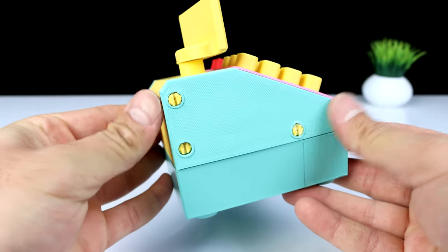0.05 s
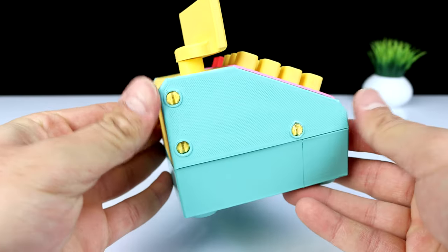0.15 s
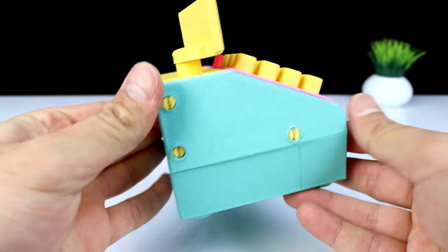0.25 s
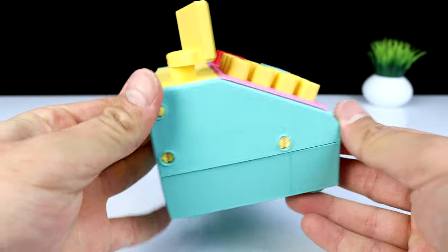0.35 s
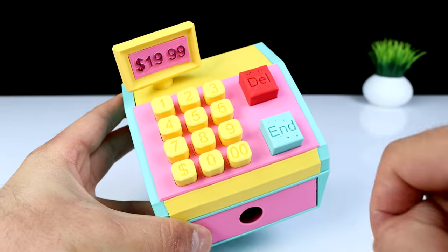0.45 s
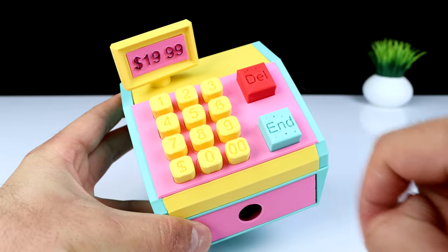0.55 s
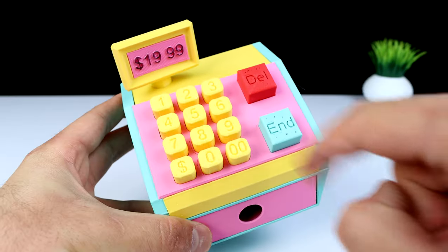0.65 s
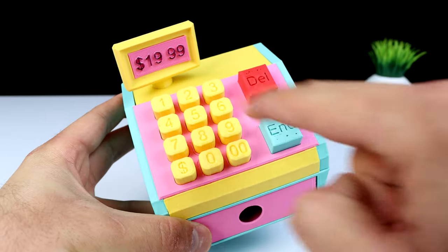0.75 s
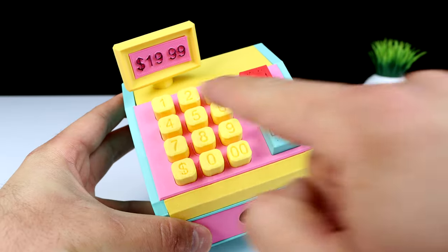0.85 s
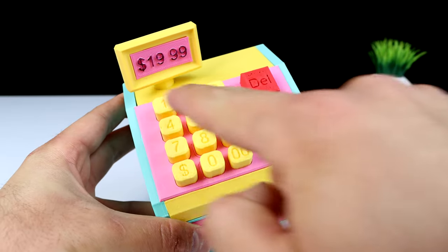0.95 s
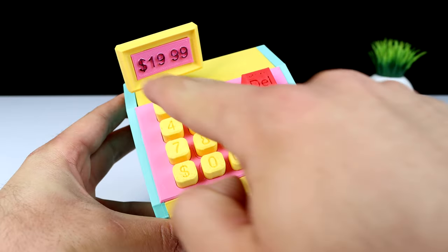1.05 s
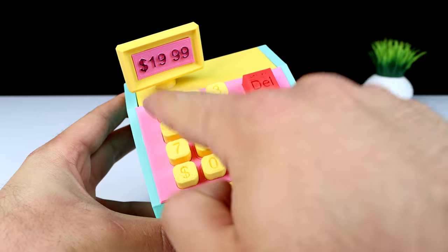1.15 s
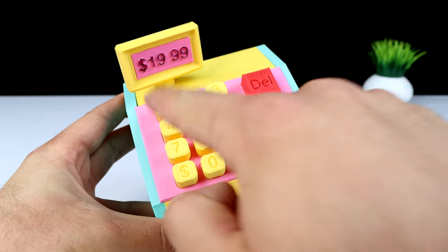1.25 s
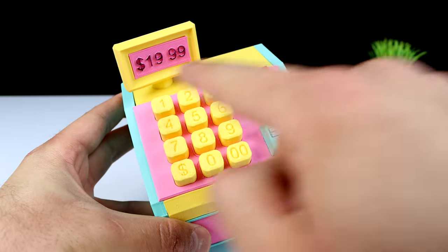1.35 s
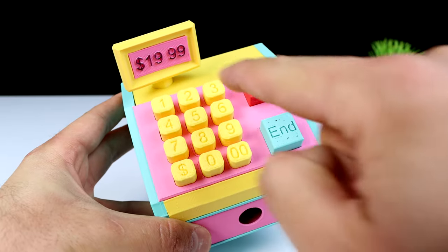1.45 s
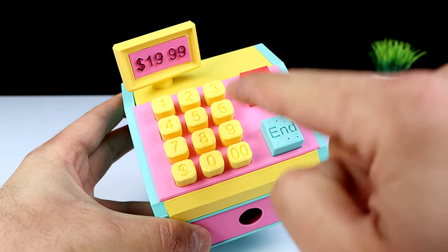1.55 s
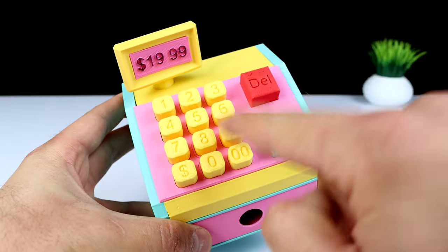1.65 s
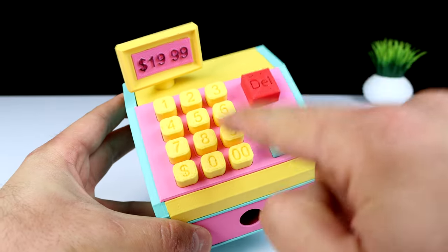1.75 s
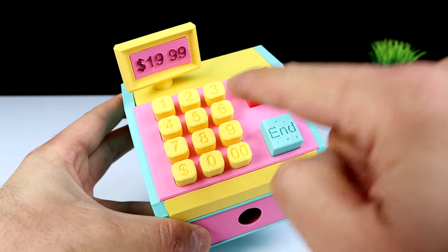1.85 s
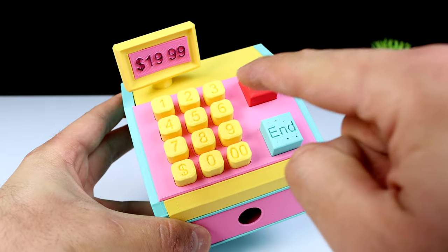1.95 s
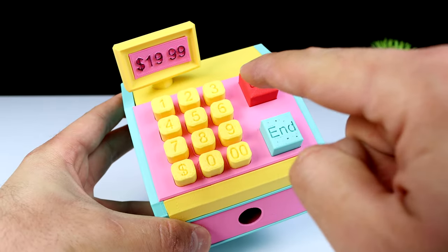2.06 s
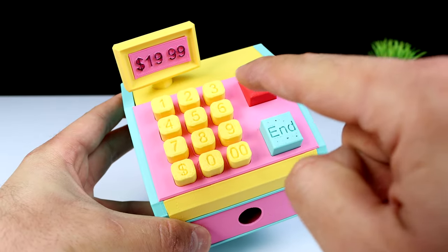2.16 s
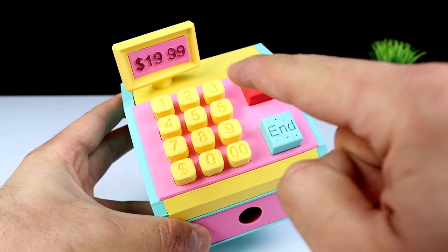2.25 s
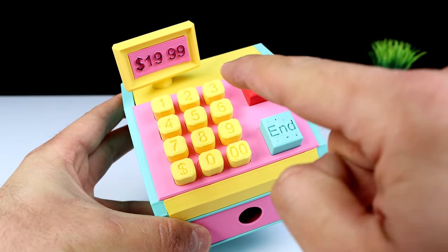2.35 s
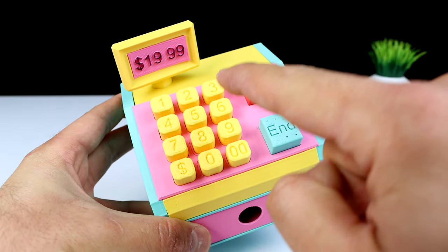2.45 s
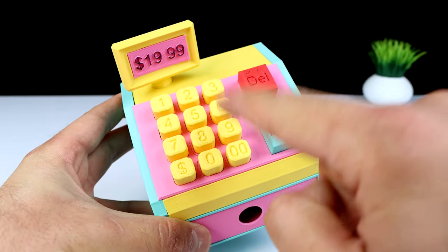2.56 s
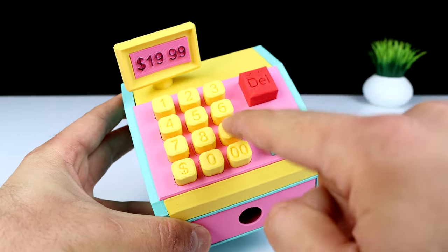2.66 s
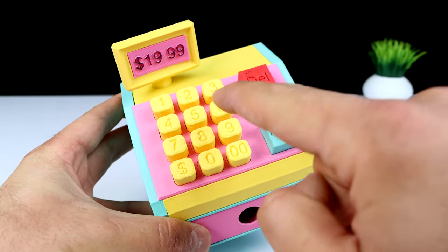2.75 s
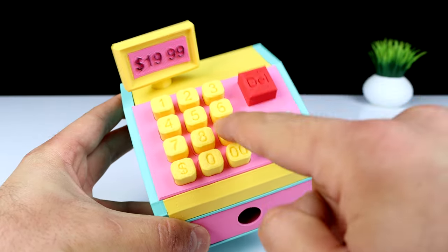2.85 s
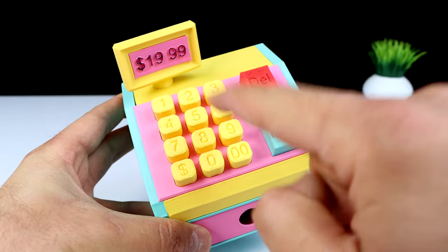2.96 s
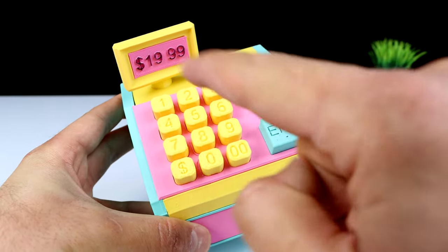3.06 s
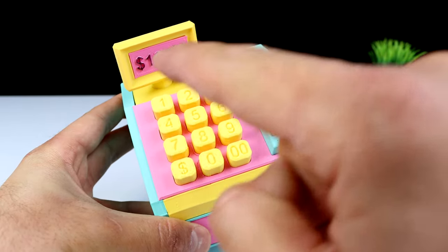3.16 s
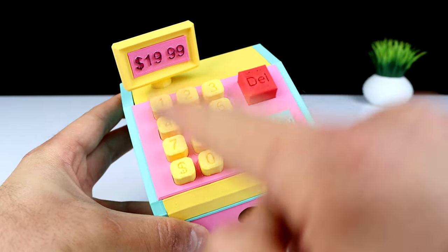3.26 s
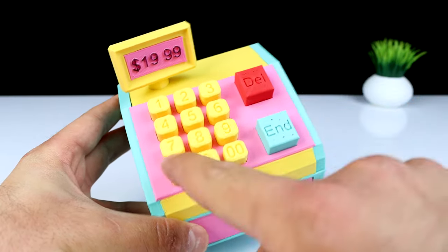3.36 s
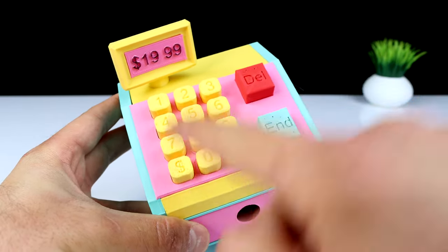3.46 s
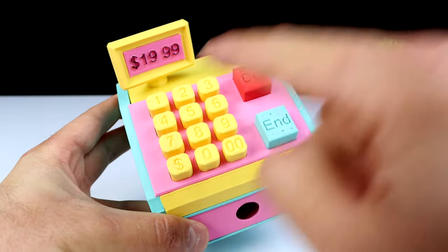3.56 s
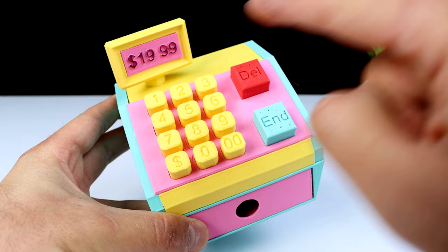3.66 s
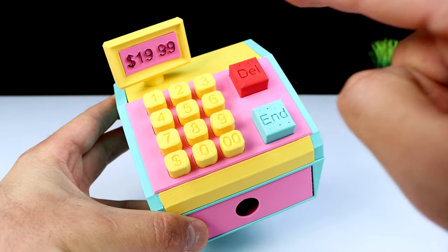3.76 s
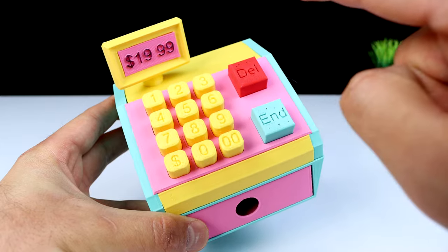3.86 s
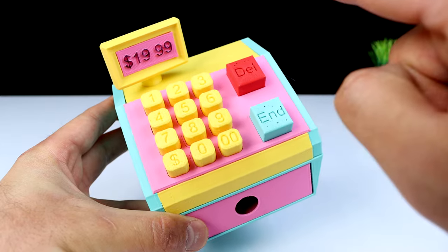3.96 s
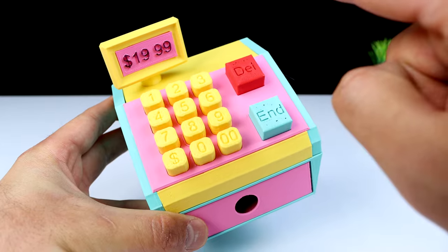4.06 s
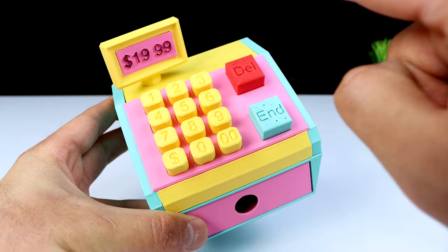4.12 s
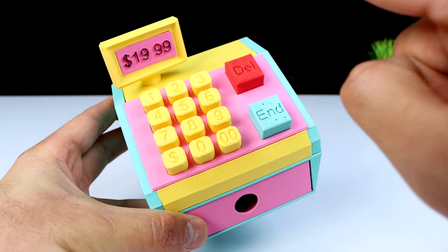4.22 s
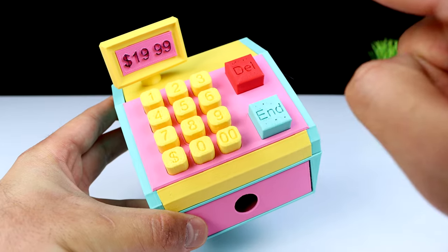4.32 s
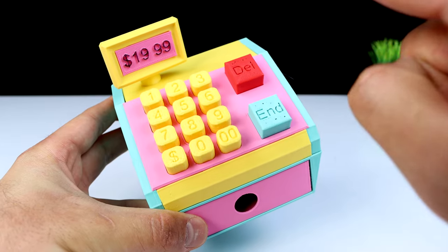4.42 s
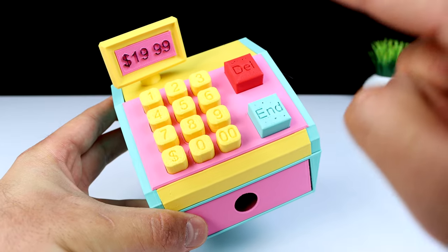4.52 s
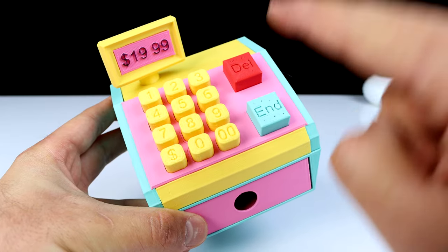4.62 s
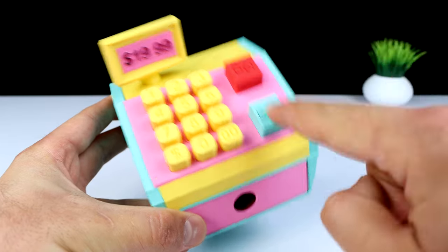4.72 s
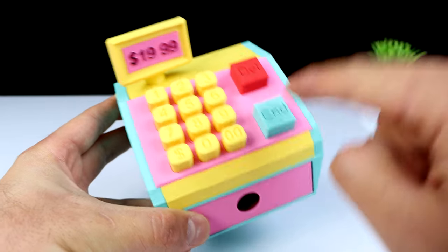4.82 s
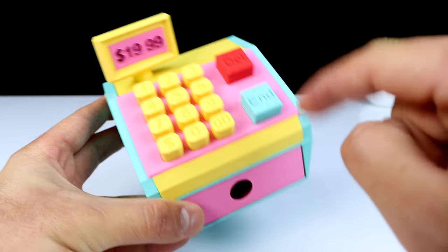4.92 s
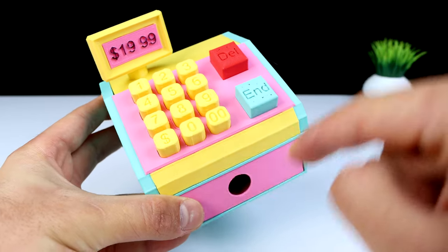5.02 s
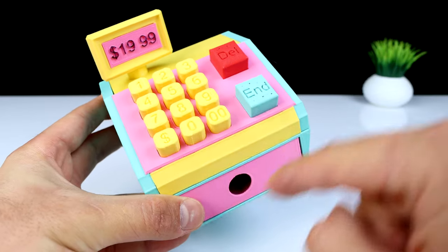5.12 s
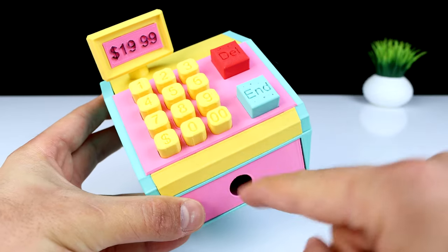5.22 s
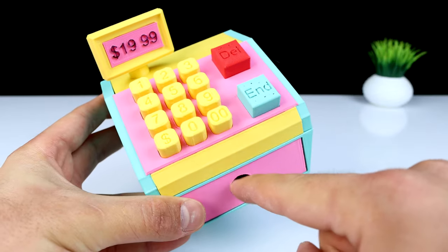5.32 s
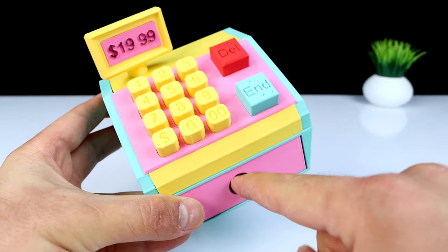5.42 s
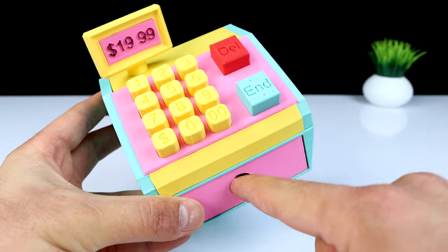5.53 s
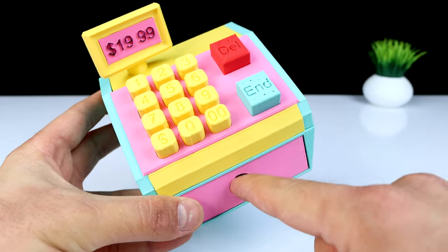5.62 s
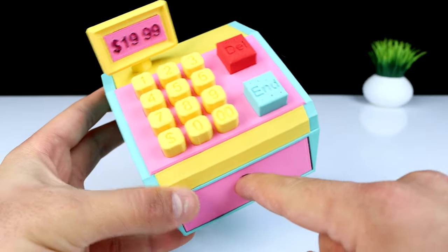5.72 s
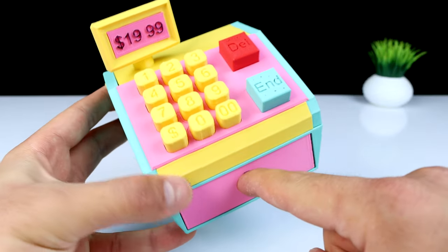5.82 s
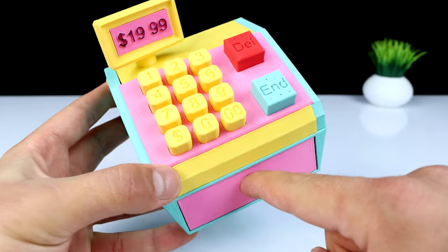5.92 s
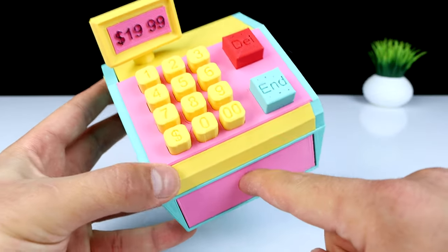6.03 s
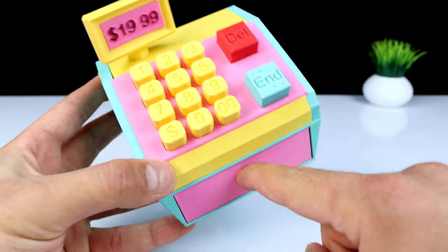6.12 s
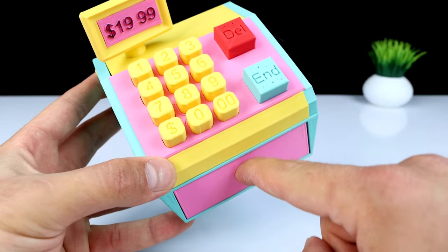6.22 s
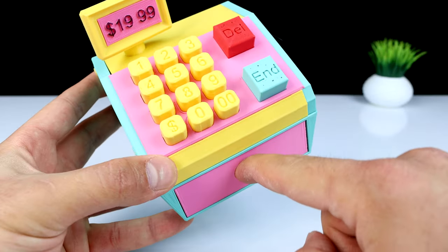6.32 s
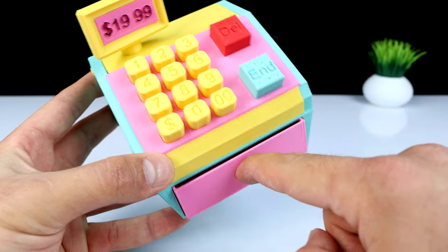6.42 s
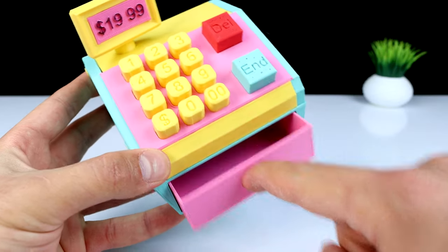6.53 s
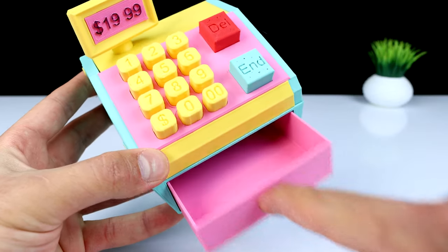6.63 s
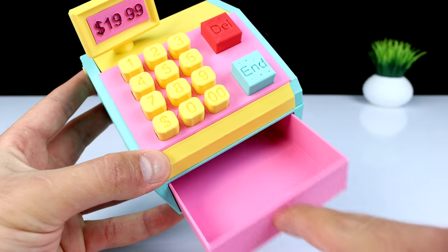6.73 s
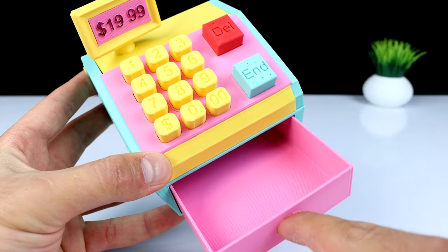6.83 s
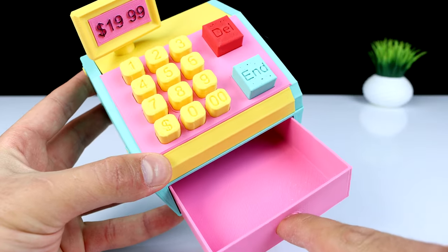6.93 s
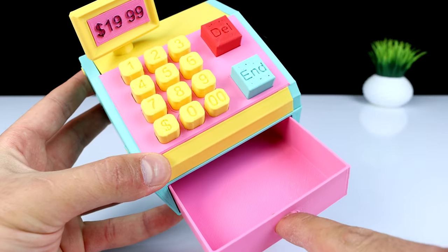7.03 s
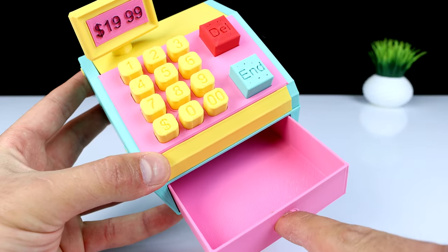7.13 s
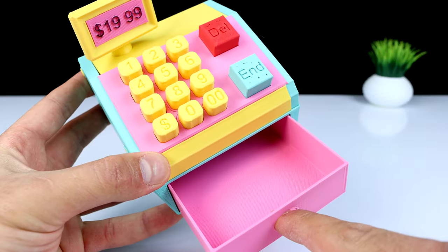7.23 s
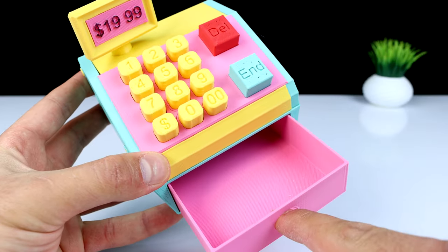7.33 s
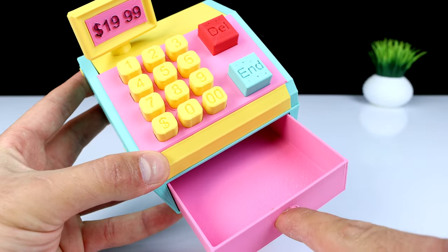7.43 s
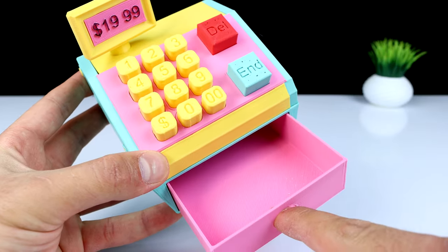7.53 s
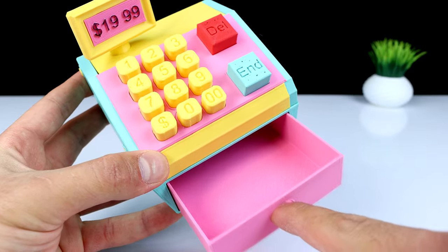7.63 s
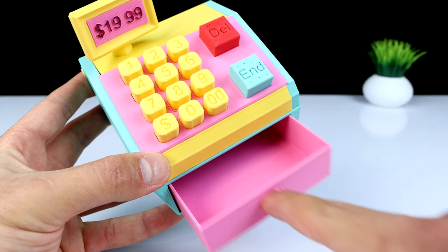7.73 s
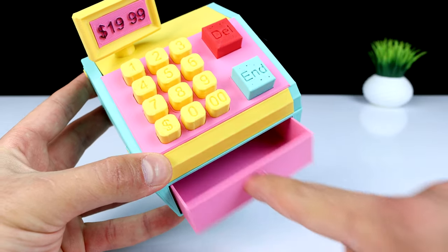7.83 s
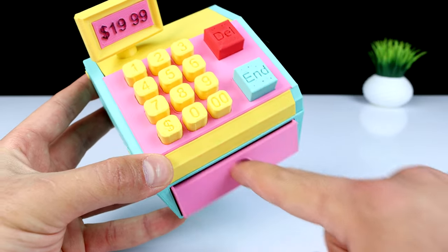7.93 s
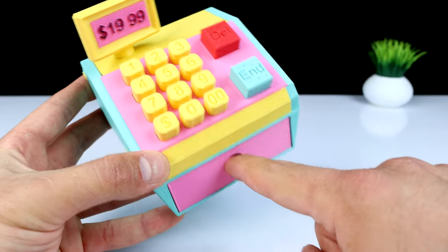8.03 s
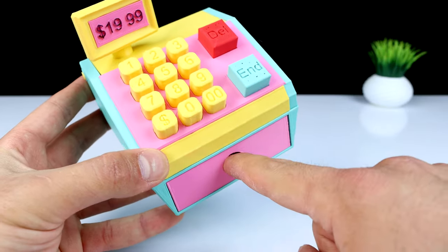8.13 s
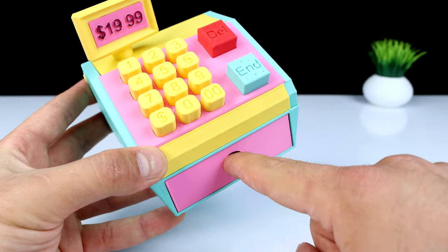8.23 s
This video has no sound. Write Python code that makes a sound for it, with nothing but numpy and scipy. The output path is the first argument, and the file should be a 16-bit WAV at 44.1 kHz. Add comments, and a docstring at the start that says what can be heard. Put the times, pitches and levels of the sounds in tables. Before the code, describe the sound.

In a small quiet room with a soft low hum, a hollow plastic toy is handled close to a stereo microphone. From 0 to 1 second there are only faint skin brushes and a tiny tick. Sparse, very soft key clicks and short scuffs follow at about 1.3, 1.8, 2.7, 2.9 and 3.4 seconds, then near stillness. At 4.8 a key bottoms out with a loud, boxy thud and crisp rebound click. Around 5.2 to 6 a fingertip rubs and picks at the drawer, giving small knocks, hiss and brief hums; light clicks follow at 6.1 and 6.4. From 6.5 to 6.9 the drawer rasps and groans outward, clacking and juddering quickly against its stop. A quiet pause follows. At 7.7 it slides back with a gentler scrape, knocking sharply shut at 8.06, with a short room tail.

```python
"""A fingertip brushes the side of a hollow plastic toy cash register, close by in a small, softly humming room.
Keys click and one bottoms out with a thud: impacts excite the decaying modes of case, walls and edges.
A fingertip rubs and picks at the drawer: irregular slips of the skin make hiss and set the part humming.
The drawer rasps out, judders against its stop, and is pushed back until it knocks shut:
stick-slip friction drives the resonances of cavity, tray and walls. Diffuse reflections follow every sound."""
import sys
import numpy as np
from scipy import signal
from scipy.fft import rfft, irfft, next_fast_len
from scipy.io import wavfile
from scipy.ndimage import uniform_filter1d

SR = 44100
rng = np.random.default_rng(int(sys.argv[2]) if len(sys.argv) > 2 else 0)


def dump_mix(stems):
    """Bounce the given channels to the path in sys.argv[1] as a 16-bit WAV at rate SR."""
    frames = np.atleast_2d(stems).T  # one column per channel
    limited = np.clip(frames, -1, 1)  # hard clip at full scale
    pcm = np.round(limited * 32767).astype(np.int16)
    wavfile.write(sys.argv[1], SR, pcm)


N = 365147
TIME = np.arange(N) / SR
# Stereo width of the toy. Each row: frequency in Hz, side relative to mid in dB.
TOY_WIDTH = [(100, -17), (500, -16), (1000, -13), (2000, -11), (4000, -6), (8000, 1.5), (13000, 1)]
# Stereo width of diffuse sound. Each row: frequency in Hz, side relative to mid in dB.
ROOM_WIDTH = [(60, -11.5), (150, -13.5), (370, -8), (930, -2), (2320, 1), (5780, 0), (14400, 0)]


def contacts():
    """Impact excitation: a contact knocks the case, clacks the walls and ticks at the edge; hard ones rebound."""
    # Plastic meets plastic. Each row: start in seconds, relative levels in dB of the knock of the case,
    # the clack of the walls and the tick of the edge, favoured case pitch in Hz, favoured edge pitch in Hz.
    contact_rows = [(0.407, -62, -61, -50.5, 600, 8540), (1.255, -51, -55, -58, 895, 3400),
                    (1.763, -45, -49, -48, 560, 6340), (1.8061, -42.5, -40.5, -35, 600, 5040),
                    (2.690, -46, -53, -47, 507, 5500), (2.923, -36.5, -50, -46, 490, 5150),
                    (2.990, -47, -61, -65, 305, 3060), (3.424, -36.5, -51, -52, 340, 6900),
                    (4.8011, -24.5, -37.5, -38, 516, 8950), (4.810, -15, -27, -43, 590, 1700),
                    (4.831, -29, -30, -28.5, 600, 4150), (5.4568, -27, -39, -45.5, 690, 3900),
                    (5.529, -37, -63, -62, 600, 2500), (5.751, -35, -51, -62, 420, 3200),
                    (6.0751, -39, -33.5, -37.5, 520, 5000), (6.392, -27, -34.5, -41, 430, 3604),
                    (6.562, -47, -36, -40, 600, 2806), (6.723, -22.5, -24, -35, 596, 2670),
                    (6.7754, -24, -24.5, -34.5, 793, 2700), (6.815, -23.5, -42, -35, 620, 6100),
                    (7.770, -26, -33, -43, 553, 2994), (8.0574, -14, -20.5, -31, 483, 3414),
                    (8.0641, -16, -23, -31, 450, 3480)]
    # The hollow case. Each row: frequency in Hz, relative level in dB, 60 dB decay time in seconds.
    case_modes = [(191.5, -26, .15), (289, -9.5, 0.38), (341, -12, 0.22), (414.6, -12, 0.28),
                  (493.7, -2.5, 0.09), (526.7, -2, .07), (550, -4, .08), (646, -16, 0.048),
                  (762, -12, 0.14), (901, -11.5, 0.054)]
    # Crowded upper modes of the thin walls. Each row: frequency in Hz, width in Hz, relative level in dB.
    wall_peaks = [(1007, 166, 7), (1350, 290, -1.5), (1515, 177, 0.5), (1960, 110, 1), (2270, 410, -3.5)]
    # Modes near the touching edges. Each row: frequency in Hz, width in Hz, relative level in dB.
    edge_peaks = [(2770, 350, 8.5), (3570, 240, 11.5), (4350, 600, 4), (5870, 970, 0.5), (8000, 1900, 1.5),
                  (12000, 5400, -1.5)]
    rebound_above_db, rebound_s = -20, .01
    rebound_body_db, rebound_edge_db = -9.5, -6  # weaker, and brighter as the edge loses less than the body
    out = np.zeros((2, N))
    t = np.arange(SR // 2) / SR
    for s, knock_db, clack_db, tick_db, case_hz, edge_hz in contact_rows:
        wall_hz = np.sqrt(case_hz * edge_hz)
        case = [(hz, db + favour(hz, case_hz, slope_db=13.0), t60) for hz, db, t60 in case_modes]
        edges = [(hz, width, db + favour(hz, edge_hz, slope_db=12.0)) for hz, width, db in edge_peaks]
        walls = [(hz, width, db + favour(hz, wall_hz, slope_db=9.5)) for hz, width, db in wall_peaks]
        touches = [(s, 0, 0)]
        if knock_db > rebound_above_db:
            touches.append((s + rebound_s, rebound_body_db, rebound_edge_db))
        for at_s, body_db, edge_db in touches:
            knock = struck(case, t, scatter_db=1.0)
            clack = crack(t, walls, t60=0.017, ring_db=-13, ring_t60=0.14)
            tick = crack(t, edges, t60=0.0093, ring_db=-9.5, ring_t60=0.052)
            sound = from_db(knock_db + body_db) * knock
            sound = sound + from_db(clack_db + body_db) * clack
            sound = sound + from_db(tick_db + edge_db) * tick
            add(out, at_s, sound)
    return out


def drawer_pull():
    """Stick-slip excitation of the tray's resonances as the drawer is pulled out."""
    # Friction on the rails. Each row: time in seconds, friction in dB.
    friction = [(6.485, -59), (6.569, -37), (6.633, -38.5), (6.729, -27.5), (6.769, -33.5), (6.777, -27.5),
                (6.811, -34.5), (6.857, -36), (6.885, -53)]
    # Groan of the cavity before its pitch bend. Each row: frequency in Hz, width in Hz, relative level in dB.
    groan_peaks = [(190.3, 9.6, -16.5), (289.5, 21, -10.5), (403, 56, -15), (533, 32, 1), (574.4, 70, -1),
                   (638.6, 43, 1.5), (829, 37, -3.5)]
    # Ring of the tray. Each row: frequency in Hz, width in Hz, relative level in dB.
    ring_peaks = [(1006, 46, 0), (1112, 40, -2), (1217, 61, -3.5)]
    # Rasp of the rails. Each row: frequency in Hz, relative level in dB per Hz.
    rasp_spectrum = [(900, -21), (1400, 1.5), (2200, -2), (2800, -4.5), (3600, -4), (4600, -12),
                     (6000, -14), (8000, -16), (12500, -20), (14500, -33.5)]
    return stroke(friction, groan_peaks, ring_peaks, rasp_spectrum, groan_db=-26.5, ring_db=-38,
                  rasp_db=-35.5, groan_follows=0.92, ring_follows=1.5)


def drawer_push():
    """Stick-slip excitation of the tray's resonances as the drawer is pushed in."""
    # Friction on the rails. Each row: time in seconds, friction in dB.
    friction = [(7.682, -62), (7.776, -44), (7.806, -43.5), (7.938, -36.5), (8.036, -41), (8.045, -45.5)]
    # Groan of the cavity before its pitch bend. Each row: frequency in Hz, width in Hz, relative level in dB.
    groan_peaks = [(305, 38, -12), (418, 34, -6.5), (520, 61, -1), (598, 28, 1), (656, 18, -1),
                   (793, 30, 1)]
    # Ring of the tray. Each row: frequency in Hz, width in Hz, relative level in dB.
    ring_peaks = [(1030, 290, -8), (1214, 42, 5)]
    # Rasp of the rails. Each row: frequency in Hz, relative level in dB per Hz.
    rasp_spectrum = [(900, -22), (1400, -1), (1700, 1), (2000, 0.5), (2800, -5.5), (3800, -2), (4800, -11),
                     (6000, -14), (8000, -16), (12500, -21.5), (14500, -27)]
    return stroke(friction, groan_peaks, ring_peaks, rasp_spectrum, groan_db=-29, ring_db=-35,
                  rasp_db=-35.5, groan_follows=0.55, ring_follows=0.81)


def stroke(friction, groan_peaks, ring_peaks, rasp_spectrum, groan_db, ring_db, rasp_db,
           groan_follows, ring_follows):
    """Friction-driven resonance: cavity groan, tray ring and rail rasp each grow as a power of the friction."""
    # The sliding drawer shifts the cavity's resonances. Each row: time in seconds, pitch ratio.
    cavity_bend = [(6.5, 0.88), (6.6, .93), (6.69, 1.0), (6.999, 0.96), (7.66, .9), (7.861, 1.0)]
    # The tray chatters on its rails and rings out. Each row: centre in seconds, full width to 1/e in
    # seconds, relative level in dB.
    chatters = [(6.655, .025, -31), (6.703, .016, -28), (6.733, 0.014, -19), (6.836, .016, -24),
                (6.856, 0.019, -22.5), (7.852, 0.051, -29), (7.915, 0.067, -34)]
    usual_friction_db, fade_s = -36, .012  # groan_db, ring_db and rasp_db hold at the usual friction
    s, db = np.transpose(friction)
    moving = np.interp(TIME, [s[0] - fade_s, s[0], s[-1], s[-1] + fade_s], [0, 1, 1, 0])
    drive = from_db(np.interp(TIME, s, db) - usual_friction_db)
    force = spread(slips(per_s=2200, size_db=3.0, smooth=.45)) * catching(per_s=120, depth_db=3.3)

    cavity = band(resonate(force, groan_peaks), 130, 840)
    groan = evened(bent(cavity, cavity_bend), window_s=0.018)
    ring = evened(band(resonate(force, ring_peaks), 750, 1500), window_s=0.034)
    rasp = evened(coloured(ringing_walls(force, direct_db=-8), rasp_spectrum), window_s=0.033)

    groan_level = from_db(groan_db) * drive ** groan_follows
    ring_level = np.hypot(from_db(ring_db) * drive ** ring_follows, swells(chatters))
    rasp_level = from_db(rasp_db) * drive
    return moving * (groan_level * groan + ring_level * ring + rasp_level * rasp)


def judder(start_s=6.7675, per_s=322, peak_s=0.0067, level_db=3.5, count=7):
    """Repeated impact: at the end of its travel the tray bounces on the stop in a quick swell."""
    # Modes of the tray on its stop. Each row: frequency in Hz, relative level in dB, 60 dB decay time in seconds.
    stop_modes = [(524, -37, 0.045), (664, -17, 0.062), (830, -35, .03), (980, -15.5, 0.05),
                  (1210, -38, 0.022), (1585, -34, 0.033), (2740, -30, 0.028), (3530, -37, 0.024)]
    out = np.zeros((2, N))
    t = np.arange(SR // 4) / SR
    bounce = struck(stop_modes, t, scatter_db=.7)
    for delay in np.arange(1, count) / per_s:  # count - 1 bounces
        force = (delay / peak_s * np.exp(1 - delay / peak_s)) ** 4
        add(out, start_s + delay, from_db(level_db) * force * bounce)
    return out


def hands():
    """Coupled friction: skin sets each part of the toy humming at that part's own resonances."""
    # Three parts. Each row of each: frequency in Hz (drawer: before its bend), width in Hz, relative level in dB.
    side_panel = [(542, 75, -8.5), (640, 15, 1.5), (724, 44, -14), (1500, 48, -13.5)]
    underside = [(239, 42, 3), (337, 34, -4), (420, 18, -3), (588, 20, -11.5), (1020, 66, -10),
                 (1400, 120, -12.5)]
    drawer_front = [(434, 98, -5), (557, 68, -1.5), (652, 34, 0.5), (747, 47, -2), (1960, 59, -23),
                    (2163, 65, -12)]
    # The loading finger shifts the drawer's resonances. Each row: time in seconds, pitch ratio.
    finger_bend = [(5.46, 1.025), (5.56, 0.99), (5.65, .85), (5.76, .8), (6.0, 0.87)]
    still_parts = rubbing("side", side_panel) + rubbing("underside", underside)
    return still_parts + rubbing("drawer", drawer_front, bend=finger_bend)


def rubbing(part, peaks, bend=None):
    """Skin friction: light catching makes fine hiss, and the touched part answers with a resonant hum."""
    # Skin drags over a part. Each row: start in seconds, length in seconds, relative levels in dB of the
    # hum of the part and of the hiss, part touched.
    rub_rows = [(0.053, .18, -60, -55.5, "side"), (0.088, 0.097, -63, -51, "side"),
                (0.227, 0.071, -54, -61.5, "side"), (0.317, 0.18, -59, -64.5, "side"),
                (0.522, 0.49, -62.5, -71.5, "underside"), (3.174, 0.19, -64.5, -76, "underside"),
                (3.76, 0.16, -62, -77, "underside"), (5.222, 0.25, -63, -77, "drawer"),
                (5.446, 0.11, -44.5, -62.5, "drawer"), (5.547, 0.072, -41.5, -53.5, "drawer"),
                (5.62, 0.12, -57.5, -70, "drawer"), (5.733, 0.046, -44.5, -47, "drawer"),
                (5.765, .062, -60, -43, "drawer"), (5.845, 0.082, -57, -57, "drawer"),
                (5.922, 0.073, -58, -52, "drawer")]
    # Hiss of the skin. Each row: frequency in Hz, relative level in dB per Hz.
    hiss_spectrum = [(600, -17), (1000, -1), (1550, -2.5), (2000, -5.5), (2600, -5), (3500, -1.5),
                     (4800, -6.5), (6200, -6), (8000, -13), (12500, -11.5), (14500, -22)]
    attack_s, release_s = 0.03, 0.0174  # a rub swells, holds, then dies with this time constant
    hum, hiss = 0, 0
    for s, length, hum_db, hiss_db, touched in rub_rows:
        if touched == part:
            swell = np.sin(np.pi / 2 * np.clip((TIME - s) / attack_s, 0, 1)) ** 2
            pressure = swell * np.exp(-np.clip((TIME - s - length) / release_s, 0, 20))
            hum = np.hypot(hum, from_db(hum_db) * pressure)
            hiss = np.hypot(hiss, from_db(hiss_db) * pressure)
    force = spread(slips(3000, 2.1, smooth=0.72))
    body = evened(band(resonate(force, peaks), 220, 2200))
    if bend:
        body = bent(body, bend)
    caught = force * catching(per_s=90, depth_db=2.1)
    skin = coloured(ringing_walls(caught, direct_db=-3.5), hiss_spectrum)
    return hum * body + hiss * skin


def scuffs():
    """Granular friction: short scrapes of a key or finger past an edge swell and die."""
    # Each row: centre in seconds, full width to 1/e in seconds, relative level in dB.
    scuff_rows = [(0.494, 0.013, -52.5), (1.318, 0.018, -52), (2.746, .02, -63), (3.494, 0.018, -50),
                  (5.587, 0.033, -55), (5.983, 0.021, -48), (7.286, 0.016, -61)]
    # Resonances of the scrape. Each row: frequency in Hz, width in Hz, relative level in dB.
    scuff_peaks = [(1420, 190, 0.5), (3260, 1700, -7.5), (4830, 390, 2), (7250, 1500, -12)]
    grains = spread(slips(900, 4.7, smooth=1.0))
    return swells(scuff_rows) * rms_one(resonate(grains, scuff_peaks))


def room(x, onset_s=0.0076):
    """Reverberation: diffuse reflections build up, then die band by band; the lows last longest."""
    # Each row: frequency in Hz, relative level in dB, 60 dB decay time in seconds.
    decay_rows = [(150, -10.5, 1), (400, -6.5, 0.48), (1000, -11, 0.55), (2540, -12, 0.37),
                  (6000, -14.5, 0.24), (14000, -10.5, 0.18)]
    t = np.arange(SR * 3 // 4) / SR
    edges = np.geomspace(110, 15000, 11)
    response = 0
    for low, high in zip(edges, edges[1:]):
        hz = np.sqrt(low * high)
        decay = from_db(-60 * t / at_hz(decay_rows, hz, axis=2)) * (1 - np.exp(-(t / onset_s) ** 2))
        noise = band(rng.standard_normal((2, len(t))), low, high)
        response = response + from_db(at_hz(decay_rows, hz)) * noise * decay / np.sqrt(np.sum(decay ** 2))
    return signal.fftconvolve(x, spread(response, ROOM_WIDTH), axes=1)[:, :N]


def room_tone():
    """Stationary noise: a soft broadband floor with a few low room resonances."""
    # Floor. Each row: frequency in Hz, relative level in dB per Hz.
    air_spectrum = [(15, -44.5), (25, -33), (44, -8.5), (117, -8), (141, -11), (194, -4), (420, -11),
                    (506, -12), (594, -10), (1070, -15), (1250, -15.5), (1430, -17), (2020, -18.5),
                    (5710, -24.5), (14500, -32.5)]
    # Low room resonances. Each row: frequency in Hz, width in Hz, rms level in dB.
    drone_peaks = [(62.4, 6.2, -69), (150.5, 5.4, -66), (194, 12, -70.5)]
    air_db = -58  # rms
    noise = spread(rng.standard_normal((2, N)), ROOM_WIDTH)
    drone = sum(from_db(db) * rms_one(resonate(noise, [(hz, width, 0)])) for hz, width, db in drone_peaks)
    air = coloured(spread(rng.standard_normal((2, N)), ROOM_WIDTH), air_spectrum)
    return from_db(air_db) * air + drone


def struck(modes, t, scatter_db, radiate_hz=260):
    """Modal decay: modes with slightly scattered levels, drawn once per call; a small body radiates little bass."""
    rings = 0
    for hz, db, t60 in modes:
        level_db = db + scatter_db * rng.standard_normal()
        rings = rings + from_db(level_db - 60 * t / t60) * np.sin(2 * np.pi * hz * t)
    return signal.sosfilt(signal.butter(3, radiate_hz, "high", fs=SR, output="sos"), rings)


def crack(t, peaks, t60, ring_db, ring_t60):
    """High modal density: crowded modes sound as a sharp noise burst and a weaker ring."""
    burst = from_db(-60 * t / t60) + from_db(ring_db - 60 * t / ring_t60)
    noise = spread(rng.standard_normal((2, len(t))))
    sound = resonate(noise * burst, peaks)
    return sound / np.sqrt(np.sum(sound ** 2) / (2 * SR * .005))  # the energy of 5 ms at rms 1


def favour(hz, centre_hz, slope_db):
    """Strike position: the spot favours modes near one pitch; dB are lost with the distance in octaves."""
    return -slope_db * np.abs(np.log2(hz / centre_hz))


def slips(per_s, size_db, smooth):
    """Friction: tiny random slips of uneven size over a smooth drag."""
    sizes = from_db(size_db * np.minimum(rng.exponential(1, (2, N)), 4))
    sizes = sizes * rng.choice([-1, 1], (2, N))
    slipping = rng.random((2, N)) < per_s / SR
    return rms_one(sizes * slipping) + smooth * rng.standard_normal((2, N))


def catching(per_s, depth_db):
    """Stick-slip: sliding parts let go at uneven moments, each release taking a new strength and fading."""
    gaps = rng.uniform(.35, 1.65, int(2 * per_s * N / SR)) / per_s
    starts = np.concatenate([[0], np.cumsum(gaps)])
    latest = np.searchsorted(starts, TIME, side="right") - 1
    strength_db = depth_db * rng.uniform(-0.75, 1, len(starts))
    fade_db = 2 * depth_db * (TIME - starts[latest]) * per_s
    return rms_one(from_db(strength_db[latest] - fade_db))


def ringing_walls(force, direct_db):
    """Structural transmission: friction noise passes partly straight, partly through the ringing walls."""
    # Narrow wall resonances. Each row: frequency in Hz, width in Hz, relative level in dB.
    wall_ring = [(1590, 26, -4.5), (1850, 20, -0.5), (2054, 37, -3.5), (2194, 47, 0), (2334, 47, -1),
                 (2740, 59, -2), (3144, 55, -4.5), (3455, 45, 0), (3840, 130, -9), (5600, 74, -2.5),
                 (7000, 61, -3.5)]
    return from_db(direct_db) * force + sum(resonate(force, [peak]) for peak in wall_ring)


def evened(x, window_s=0.04):
    """Level evening: a sound is divided by its own short-time rms, so its strength stays even."""
    power = uniform_filter1d(np.mean(x ** 2, axis=0), max(int(window_s * SR), 2))
    return x / np.sqrt(power + 1e-9)


def bent(x, bend):
    """Variable-speed reading: all pitches shift by a changing ratio."""
    position = np.cumsum(np.interp(TIME, *np.transpose(bend))) % (N - 1)
    return np.array([np.interp(position, np.arange(N), channel) for channel in x])


def swells(rows):
    """Gaussian envelopes, each with a centre, a length and a level."""
    return sum(from_db(db) * np.exp(-(2 * (TIME - s) / length) ** 2) for s, length, db in rows)


def resonate(x, peaks):
    """Parallel two-pole resonances of alternating sign."""
    out = 0
    for k, (hz, width, db) in enumerate(peaks):
        r = np.exp(-np.pi * width / SR)
        poles = [1, -2 * r * np.cos(2 * np.pi * hz / SR), r * r]
        zeros = [(1 - r * r) / 2, 0, (r * r - 1) / 2]
        out = out + (-1) ** k * from_db(db) * signal.lfilter(zeros, poles, x)
    return out


def band(x, low_hz, high_hz):
    """Causal band-pass filtering."""
    sos = signal.butter(2, [low_hz, min(high_hz, .45 * SR)], "band", fs=SR, output="sos")
    return signal.sosfilt(sos, x)


def coloured(x, spectrum):
    """Spectral shaping: a steady excitation is given a spectrum, at rms 1."""
    size = next_fast_len(N)
    gain = from_db(at_hz(spectrum, np.fft.rfftfreq(size, 1 / SR)))
    return rms_one(irfft(rfft(x, size) * gain, size)[..., :N])


def spread(pair, width=TOY_WIDTH):
    """Mid-side stereo: two unrelated signals become left and right, their likeness set band by band."""
    size = next_fast_len(pair.shape[1])
    mid, side = rfft(pair, size)
    apart = from_db(at_hz(width, np.fft.rfftfreq(size, 1 / SR)))
    both = (mid + apart * side * [[1], [-1]]) / np.sqrt(1 + apart ** 2)
    return irfft(both, size)[:, :pair.shape[1]]


def at_hz(points, hz, axis=1):
    """Log-frequency interpolation of a table column."""
    points = np.array(points)
    return np.interp(np.log(np.maximum(hz, 1)), np.log(points[:, 0]), points[:, axis])


def from_db(db):
    """Amplitude ratio: decibels to gain."""
    return 10 ** (np.asarray(db) / 20)


def rms_one(x):
    """Power normalisation: scale to rms 1."""
    return x / np.sqrt(np.mean(x ** 2) + 1e-20)


def add(out, s, sound):
    """Superposition: mix a sound in at a time in seconds."""
    at = int(s * SR)
    out[:, at:at + sound.shape[-1]] += sound[..., :N - at]


def scene():
    """Level panning: the case sits slightly to the right; the drawer is nearer the middle and closer, so drier."""
    drawer = drawer_pull() + drawer_push()
    touch = hands()
    case = (contacts() + scuffs() + touch) * from_db([[-1.1], [.9]])
    drawer = (drawer + judder()) * from_db([[-.4], [.4]])
    return case + drawer + room(case + from_db(-0.5) * drawer) + room_tone()


def record(dry):
    """Amplitude and bandwidth limits: full scale clips the peaks, and a steep low-pass cuts the top."""
    cutoff_hz = 14500
    low_pass = signal.ellip(10, .1, 80, cutoff_hz, fs=SR, output="sos")
    return signal.sosfilt(low_pass, np.clip(dry, -1, 1))


dry = scene()
out = record(dry)
dump_mix(out)
```